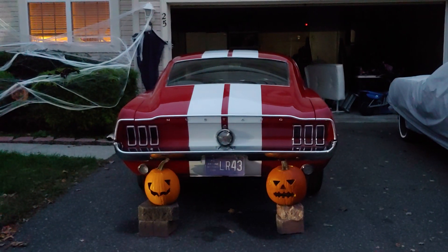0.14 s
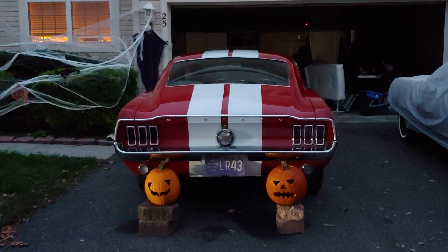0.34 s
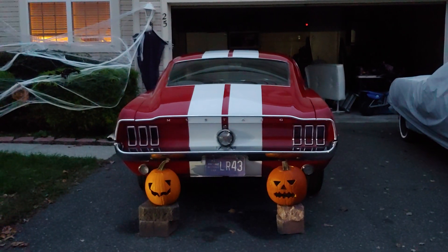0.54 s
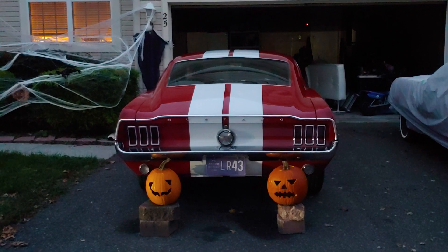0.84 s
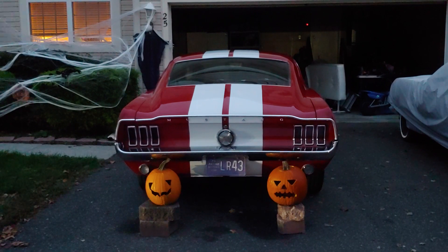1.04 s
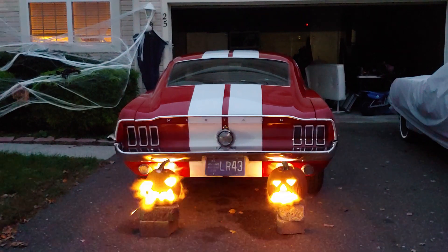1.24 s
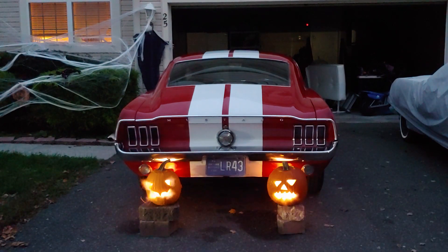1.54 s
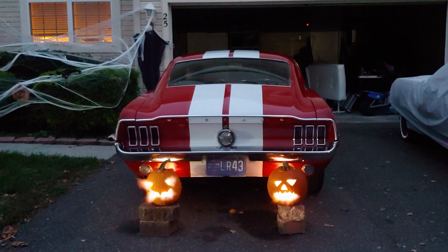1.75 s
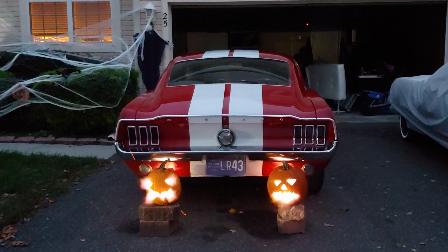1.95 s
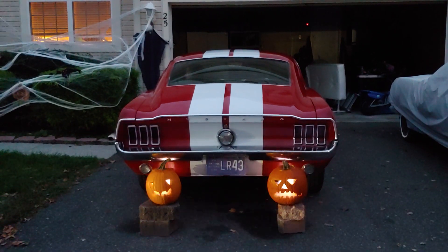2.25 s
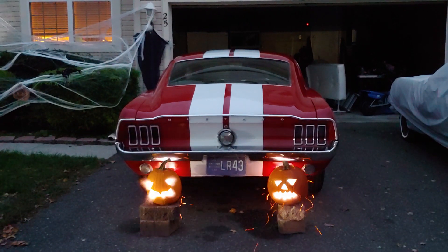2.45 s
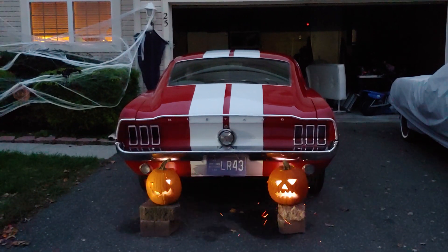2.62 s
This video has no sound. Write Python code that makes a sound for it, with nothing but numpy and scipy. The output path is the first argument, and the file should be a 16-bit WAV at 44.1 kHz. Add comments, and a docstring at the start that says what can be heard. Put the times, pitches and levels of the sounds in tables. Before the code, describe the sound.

A V8 with open exhausts revs loudly, sinks to a lumpy popping idle, then catches again

```python
"""A V8 with twin open exhausts, heard from behind in a driveway: it revs, sinks to a lumpy idle, then
catches again with a pop and a short boom. Engine orders and uneven firing pulses ring the pipes.
Shaped noise makes the puffing rasp and hiss at the outlets and the low flutter of flaming fuel.
Afterfire, burbles of the idle and narrow whistles come on top; a short dull yard echo surrounds all."""
import sys
import numpy as np
from scipy import signal
from scipy.fft import rfft, irfft
from scipy.io import wavfile
from scipy.ndimage import uniform_filter1d

SR = 44100
rng = np.random.default_rng(int(sys.argv[2]) if len(sys.argv) > 2 else 0)


def output_pcm(signal):
    """Save a mono or channel-first signal as 16-bit PCM at the path in sys.argv[1].

    Samples are clipped to [-1, 1] before scaling.
    """
    pcm = np.clip(np.atleast_2d(signal).T, -1, 1) * 32767
    wavfile.write(sys.argv[1], SR, np.round(pcm).astype(np.int16))


N = 122598

# engine speed, eight firings in each cycle: start_s, cycle_rate_hz
SPEED = [(0,36.4),(.18,40.7),(.3,39.6),(.36,40.3),(.47,43.6),(.56,42.6),(.65,42.3),(.73,38.2),(.87,36.6),(.96,33.2),(1.07,31.2),(1.25,26.6),(1.65,19.4),(2.05,13),(2.25,11.2),(2.36,11.8),(2.45,15.2),(2.57,19),(2.78,20.2)]
# boom of the exhaust before its trim: start_s, level_db
BOOM = [(0.0,-15.5),(0.11,-13.5),(0.18,-33),(0.22,-11.5),(0.37,-19),(0.5,-26.5),(0.52,-15.5),(0.93,-18),(1.21,-7),(1.35,-15),(1.68,-14.5),(1.8,-10.5),(1.95,-12.5),(2.3,-19),(2.41,-8),(2.51,-4),(2.62,-18.5),(2.64,-47),(2.7,-13.5)]
# midrange bark of the exhaust before its trim: start_s, level_db
BARK = [(0.0, -17), (0.07, -11), (0.47, -17), (0.62, -10), (0.73, -24), (0.77, -9.5), (0.96, -22.5),
        (1.06, -12), (1.1, -23), (1.19, -16.5), (1.26, -33), (1.28, -21), (1.42, -29), (1.51, -23),
        (1.79, -16), (1.85, -29), (2.46, -26.5), (2.5, -15.5), (2.6, -28.5), (2.75, -27.5)]
# rasp, chuff and growl before their trims: start_s, level_db
RASP = [(0.0, -30.5), (0.15, -18), (0.25, -31.5), (0.45, -16), (0.54, -26.5), (0.57, -19), (0.71, -28.5),
        (1.19, -32.5), (1.21, -37.5), (1.78, -31.5), (1.81, -36), (1.98, -32), (2.29, -35.5), (2.39, -28.5),
        (2.75, -43.5)]
# hiss before its trim: start_s, level_db
HISS = [(0.0,-34.5),(0.08,-29.5),(0.3,-34.5),(0.4,-26.5),(0.54,-31),(1.13,-33.5),(1.22,-40),(2.34,-48),(2.37,-40),(2.53,-42),(2.63,-49)]
# share of uneven puffs in the exhaust note: start_s, share_0_to_1
UNEVEN = [(1.05,.04),(1.4,.3),(1.6,.55),(1.85,.2),(2.3,.65),(2.45,.12)]
# multiples 1 to 16 of the cycle rate, the top eight repeat upward: all_firing_db, some_missing_db
ORDER_DB = [(-20.5,-4),(-11.5,-1.5),(-13.5,4.5),(-5,0),(2.5,2),(-4.5,5),(-12,-2),(7.5,-8.5),(-4.5,-1.5),(-1,4),(2.5,0),(-0.5,-16),(-2.5,0),(-6.5,0.5),(3,-24),(-4.5,5.5)]
# spells in which some cylinders miss: start_s, end_s
MISFIRES = [(.205,0.32),(0.518,0.66),(.9,1.008),(1.14,1.28)]
# single orders that swell or sink for a moment: start_s, end_s, cycle_rate_multiple, change_db
SWELLS = [(.05,.2,22,9),(.21,.33,3,-10),(.53,.67,13,6),(.55,.69,17,9),(.74,.89,11,6),(.75,.97,15,9),(.98,1.16,22,14)]
# response of the exhaust pipes: frequency_hz, gain_db
PIPE = [(25,-30.5),(55,-12.5),(95,-7),(140,5),(190,-3),(250,0),(310,-1),(365,-18),(420,-3),(470,-16.5),(555,-11.5),(630,-20.5),(715,-11),(800,-18.5),(950,-10.5),(1180,-15.5),(1400,-35.5),(1470,-21),(1690,-30),(1900,-49.5),(3000,-32.5),(5000,-69.5)]
# relative spectrum of the rasp: frequency_hz, density_db_per_hz
RASP_COLOUR = [(60,-41.5),(380,-19),(520,0.5),(800,0),(1200,5.5),(1450,3),(1700,3.5),(2200,-0.5),(2700,-19.5),(5000,-54)]
# at speed the pitched growl outweighs the rasp: cycle_rate_hz, rasp_change_db
RASP_BY_SPEED = [(28,-2),(40,-6.5)]
# relative spectrum of the chuff, the low part of the rasp: frequency_hz, density_db_per_hz
CHUFF_COLOUR = [(60,-30),(370,-9),(520,7),(700,-7.5),(1000,-25),(3000,-58)]
# the chuff is weak at speed: cycle_rate_hz, chuff_change_db
CHUFF_BY_SPEED = [(20,-4.5),(27,-7.5),(40,-8.5)]
# relative spectrum of the hiss: frequency_hz, density_db_per_hz
HISS_COLOUR = [(100,-42),(1200,-3),(2200,0.5),(2800,-8),(3700,0.5),(4450,0.5),(5100,-8.5),(6200,-7),(7200,-2.5),(8500,-31.5),(9900,-20.5),(12000,-18.5),(13000,-33.5)]
# rumble of the flames: start_s, level_db
FLAME = [(.85,-44),(1.12,-40),(1.26,-30),(1.6,-28),(1.9,-33),(2.3,-23),(2.58,-36)]
# relative spectrum of the flames: frequency_hz, density_db_per_hz
FLAME_COLOUR = [(18,-25),(32,16),(75,25.5),(130,-7),(1500,-140)]
# fuel lighting in the pipes: start_s, thud_db, ring_hz, ring_t60_s, crack_db
AFTERFIRE = [(0.326,-34,150,.05,-8),(0.526,-3,153,.15,-42),(0.666,-14,56.6,0.23,-36),(2.358,-5,87.5,0.069,-8),(2.382,-5,92,.14,-12)]
# relative spectrum of afterfire cracks and burble spits: frequency_hz, density_db_per_hz
CRACK_COLOUR = [(100,-8.5),(400,12),(1000,8.5),(2600,-15.5),(4100,-4.5),(5500,-33),(7200,-15),(8500,-50)]
# loud single firings of the lumpy idle: start_s, level_db
BURBLES = [(1.279,-5),(1.613,-9),(1.694,-5),(1.733,-6),(1.789,-7),(1.95,-8),(2.076,-10),(2.123,-7),(2.152,-9),(2.184,-8),(2.233,-10)]
# narrow rings of the outlets: start_s, end_s, pitch_hz, level_db
WHISTLES = [(1.46,1.8,1400,-37),(1.675,1.76,1205,-28),(1.63,2.8,504,-31.5)]
# likeness of left and right in the turbulence: frequency_hz, likeness_0_to_1
SAME = [(200,.998),(600,.93),(1200,.6),(2400,.2),(6000,.05)]
# stereo lean: frequency_hz, left_minus_right_db
LEAN = [(100,1),(1250,2),(2100,-7.5),(5500,3),(7500,-8.5),(15000,13)]

# exhaust note: trims, band edges, softness of the puffs
BOOM_DB, BARK_DB, GROWL_DB = -.5, -0.8, 1
SPLIT_HZ, GROWL_SPLIT_HZ = 205.7, 600
PUFF_HZ = 380
# below the idle rate, every order but the plain firing note sinks
IDLE_BELOW_HZ, IDLE_FADE_HZ, IDLE_DROP_DB = 18, 0.71, -5
JITTER_CYCLES, ORDER_DRIFT_DB, SWELL_FADE_S = .002, 2, .035
# outlets: puff decay in firings, steady rush as gain against a puff of 1, trims
PUFF_FIRINGS, RASP_STEADY, HISS_STEADY = 1, 1, 3.3
RASP_DB, HISS_DB = 4, 3.5
# yard echo: level, decay, treble limit
YARD_DB, YARD_T60_S, YARD_HZ = -18, 0.57, 2000
# afterfire; the size of a crackle grain is a gain against the rush
THUD_RISE_S, CRACK_RISE_S, CRACK_T60_S = 0.0014, .0004, .055
CRACKLE_PER_S, CRACKLE_SIZE = 700, 11
# burbles: base pitch and its relative spread, swing rise, decay and level of the spit
BURBLE_HZ, BURBLE_SPREAD, BURBLE_RISE_S = 116, .12, .0055
SPIT_T60_S, SPIT_DB = .06, -14.5
WHISTLE_WIDTH_HZ = 42
EDGE_HZ = 15400


def amp(db):
    """Decibels to gain."""
    return 10 ** (np.asarray(db) / 20)


def unit(x):
    """Scales to rms 1."""
    return x / np.sqrt(np.mean(x ** 2) + 1e-20)


def curve(points):
    """A control through time."""
    return np.interp(np.arange(N) / SR, *np.transpose(points))


def by_speed(points, speed):
    """A control that follows the engine speed."""
    return np.interp(speed, *np.transpose(points))


def read(points, hz):
    """A spectrum at given frequencies, joined along a log scale."""
    f, value = np.transpose(points)
    return np.interp(np.log(hz + 1), np.log(f + 1), value)


def bins():
    """Frequencies of a full-length spectrum."""
    return np.fft.rfftfreq(N, 1 / SR)


def smooth(x, size):
    """Two passes of a moving average."""
    return uniform_filter1d(uniform_filter1d(x, size), size)


def steady(x, size=3000):
    """Holds the running rms near 1."""
    return x / np.sqrt(abs(smooth(x ** 2, size)) + 1e-12)


def wander(size, length=N):
    """Smooth chance of rms 1."""
    return unit(smooth(rng.standard_normal(length), size))


def fall(t, t60):
    """Exponential decay by 60 dB in t60 seconds."""
    return np.exp(-np.log(1000) * t / t60)


def since(start):
    """Seconds since an event, zero before it."""
    return np.maximum(np.arange(N) / SR - start, 0)


def ring(x, colour, size=4096):
    """Causal minimum-phase filter with the given spectrum."""
    log_gain = np.log(amp(read(colour, abs(np.fft.fftfreq(size, 1 / SR)))))
    response = np.fft.ifft(np.exp(np.conj(signal.hilbert(log_gain)))).real
    return signal.fftconvolve(x, response[:size // 2])[:N]


def band(x, hz):
    """Splits a sound into the parts below and above a frequency."""
    filters = [signal.butter(4, hz, kind, fs=SR, output="sos") for kind in ("low", "high")]
    return [signal.sosfiltfilt(sos, x) for sos in filters]


def air(colour, gate=1):
    """Gated stereo turbulence, nearly mono in the bass and wide in the treble."""
    a, b = rfft(rng.standard_normal((2, N)) * gate)
    same = np.clip(read(SAME, bins()), -1, 1)
    pair = np.array([a, same * a + np.sqrt(1 - same ** 2) * b])
    return unit(irfft(pair * amp(read(colour, bins())), N))


def engine_orders(speed, turns):
    """The pitched part: multiples of the cycle rate, weighted by the firing pattern and the pipes."""
    t = np.arange(N) / SR
    slow, rate = t[::64], speed[::64]  # levels move slowly enough for a coarse clock
    missing = uniform_filter1d(1. * sum((slow > a) & (slow < b) for a, b in MISFIRES), size=24)
    idle = np.clip((IDLE_BELOW_HZ - rate) / IDLE_FADE_HZ, 0, 1)
    turns = turns + JITTER_CYCLES * wander(size=130)
    out = np.zeros(N)
    for k in range(1, 57):
        full_db, miss_db = ORDER_DB[k - 1 if k <= 16 else 8 + (k - 1) % 8]
        level = (1 - missing) * full_db + missing * miss_db
        level += read(PIPE, k * rate)
        level += idle * IDLE_DROP_DB * (k != 8)  # order 8 is the firing note
        level += ORDER_DRIFT_DB * wander(size=40, length=len(slow))
        for start, end, order, change_db in SWELLS:
            if order == k:
                inside = np.minimum(slow - start, end - slow)
                level += change_db * np.clip(inside / SWELL_FADE_S + .5, 0, 1)
        out += np.interp(t, slow, amp(level)) * np.cos(2 * np.pi * (k * turns + rng.random()))
    return out


def exhaust(speed, turns, strength):
    """Engine orders and uneven firing pulses ring the pipes: boom, bark and growl."""
    firing = np.floor(8 * turns)
    pulses = (np.diff(firing, prepend=0) > 0) * strength
    puffs = signal.lfilter(*signal.butter(1, PUFF_HZ, fs=SR), ring(pulses, PIPE))
    share = np.clip(curve(UNEVEN), 0, 1)
    note = (1 - share) * steady(engine_orders(speed, turns)) + share * steady(puffs, size=5000)
    boom, upper = band(note, SPLIT_HZ)
    bark, growl = band(upper, GROWL_SPLIT_HZ)
    boom = steady(boom, size=1600) * amp(curve(BOOM) + BOOM_DB)
    bark = steady(bark, size=1600) * amp(curve(BARK) + BARK_DB)
    growl = steady(growl, size=1800) * amp(curve(RASP) + GROWL_DB)
    return boom + bark + growl


def outlets(speed, turns, strength, uneven_db=4.0):
    """Each firing blows a puff of chuff, rasp and hiss; rasp and hiss also have a steady rush."""
    phase = (8 * turns) % 1
    puff = np.exp(-phase / PUFF_FIRINGS) * amp(uneven_db * np.clip(strength, -2, 2))
    rasp = air(RASP_COLOUR, RASP_STEADY + puff) * amp(by_speed(RASP_BY_SPEED, speed))
    chuff = air(CHUFF_COLOUR, puff) * amp(by_speed(CHUFF_BY_SPEED, speed))
    hiss = air(HISS_COLOUR, HISS_STEADY + puff) * amp(curve(HISS) + HISS_DB)
    return (rasp + chuff) * amp(curve(RASP) + RASP_DB) + hiss


def flames():
    """Low flutter of burning fuel at the tailpipes: bass noise held steady, the same on both sides."""
    return steady(air(FLAME_COLOUR)[0], size=2500) * amp(curve(FLAME))


def yard(x):
    """Short dull reflections from the house and garage: a decaying noise tail on each side."""
    t = np.arange(SR // 2) / SR
    tail = rng.standard_normal((2, len(t))) * (t > .008) * fall(t, YARD_T60_S)
    tail = signal.lfilter(*signal.butter(1, YARD_HZ, fs=SR), tail / np.linalg.norm(tail[0]))
    return signal.fftconvolve(x, tail, axes=1)[:, :N]


def afterfire(start, thud_db, hz, t60, crack_db):
    """Fuel lights in a pipe: a ringing thud and a crackling crack."""
    t = since(start)
    thud = np.sin(2 * np.pi * hz * t) * (1 - np.exp(-t / THUD_RISE_S)) * amp(thud_db) * fall(t, t60)
    crack = (1 - np.exp(-t / CRACK_RISE_S)) * amp(crack_db) * fall(t, CRACK_T60_S)
    grains = rng.random(N) < CRACKLE_PER_S / SR
    return thud + air(CRACK_COLOUR, 1 + CRACKLE_SIZE * grains) * crack


def burbles():
    """Loud single firings: a few low swings of the pipe and a spit of gas."""
    swings, spits = np.zeros(N), np.zeros(N)
    for start, db in BURBLES:
        t = since(start)
        hz = BURBLE_HZ * (1 + BURBLE_SPREAD * rng.uniform(-1.1, 1))
        swell = t / BURBLE_RISE_S * np.exp(1 - t / BURBLE_RISE_S)
        swings += amp(db) * swell * np.sin(2 * np.pi * hz * t)
        spits += amp(db) * (1 - np.exp(-t / THUD_RISE_S)) * fall(t, SPIT_T60_S)
    return swings + air(CRACK_COLOUR) * spits * amp(SPIT_DB)


def whistle(start, end, hz, db):
    """The gas stream stirs a narrow resonance that swells and fades."""
    progress = np.clip((np.arange(N) / SR - start) / (end - start), 0, 1)
    swell = np.sqrt(abs(np.sin(np.pi * progress)))
    resonance = 1 / (1 + (2 * (bins() - hz) / WHISTLE_WIDTH_HZ) ** 2)
    stirred = irfft(rfft(rng.standard_normal(N)) * resonance, N)
    return amp(db) * swell * steady(stirred)


def scene():
    """One crankshaft drives exhaust and outlets; flames, afterfire, burbles, whistles and yard join."""
    speed = curve(SPEED) * (1 + 0.0027 * wander(size=700))
    turns = np.cumsum(speed) / SR
    # one random strength for each firing
    strength = np.clip(rng.standard_normal(2000), -1.5, 1.5)[(8 * turns).astype(int)]
    dry = exhaust(speed, turns, strength) + outlets(speed, turns, strength) + flames()
    dry = dry + sum(afterfire(*row) for row in AFTERFIRE)
    dry = dry + burbles() + sum(whistle(*row) for row in WHISTLES)
    return dry + amp(YARD_DB) * yard(dry)


def record(dry):
    """Microphone balance, soft overload near full scale and the band limit."""
    lean = read(LEAN, bins()) / 2
    x = irfft(rfft(dry) * amp(np.array([lean, -lean])), N)
    x = x / (1 + x ** 8) ** (1 / 8)
    lowpass = signal.firwin(511, EDGE_HZ, window=("kaiser", 9), fs=SR)
    return signal.oaconvolve(x, lowpass[None], "same")


dry = scene()
out = record(dry)
output_pcm(out)
```